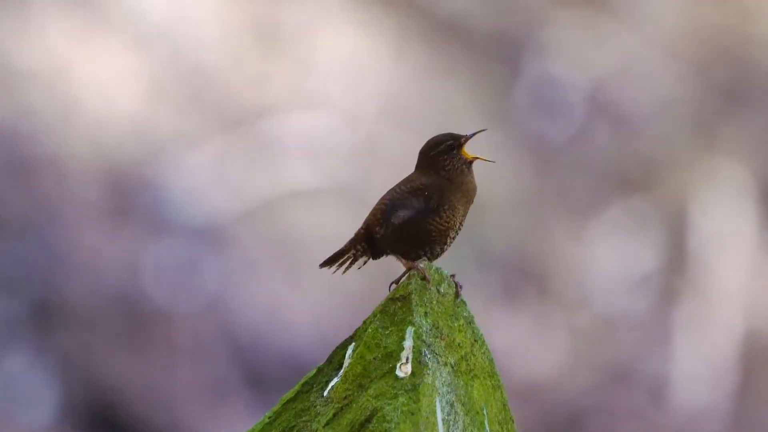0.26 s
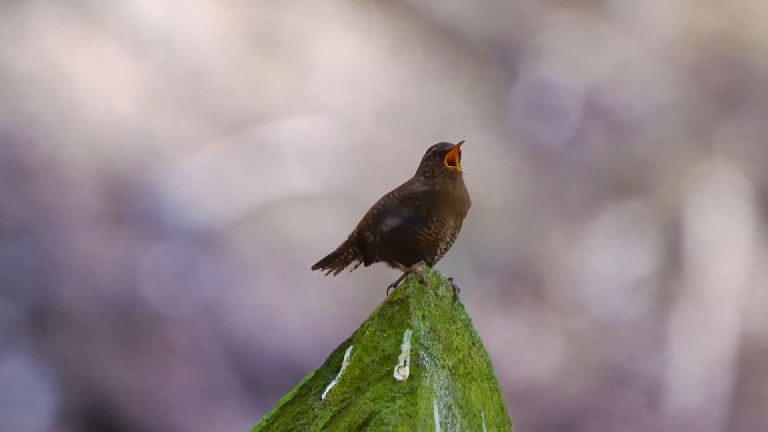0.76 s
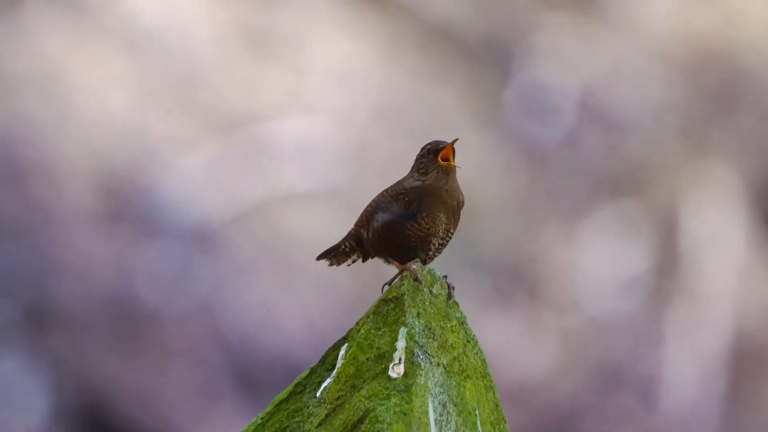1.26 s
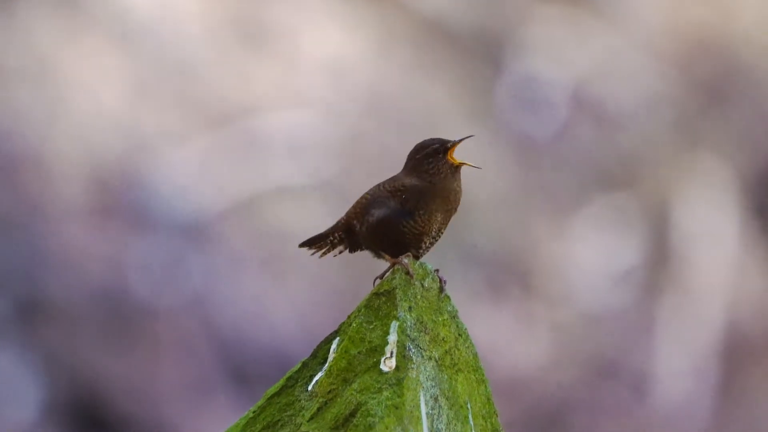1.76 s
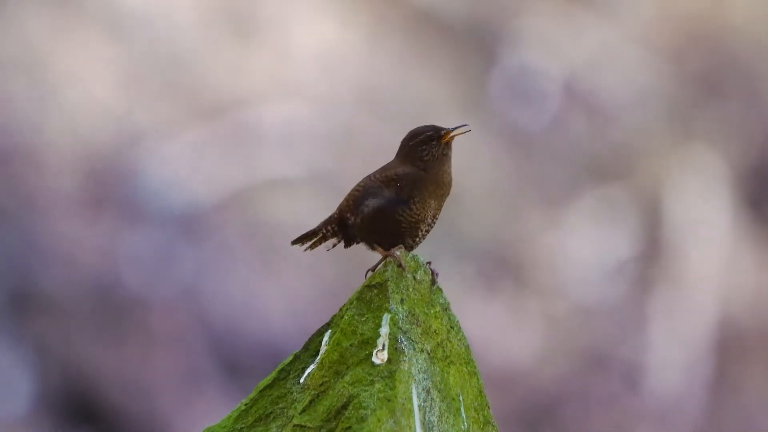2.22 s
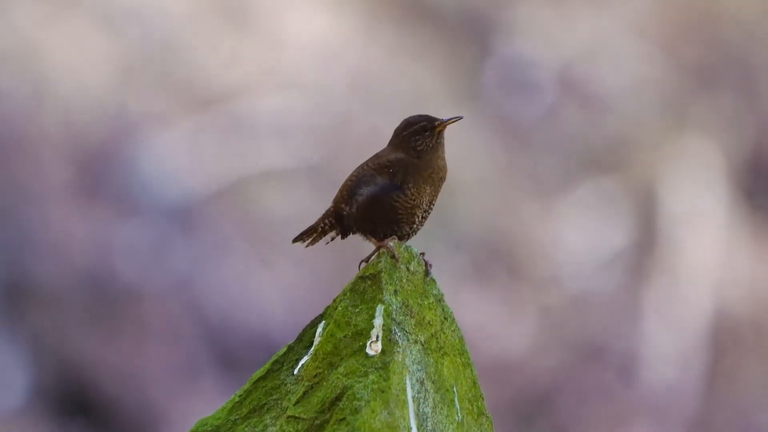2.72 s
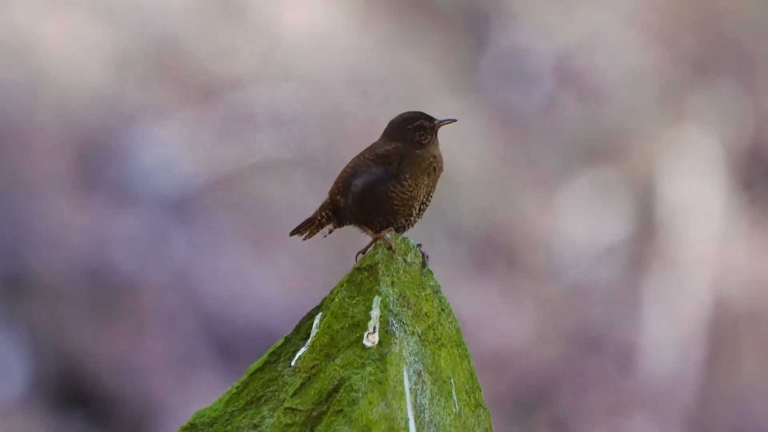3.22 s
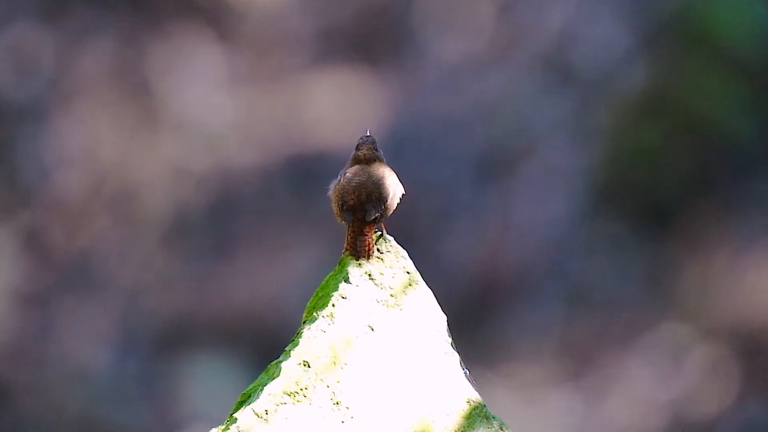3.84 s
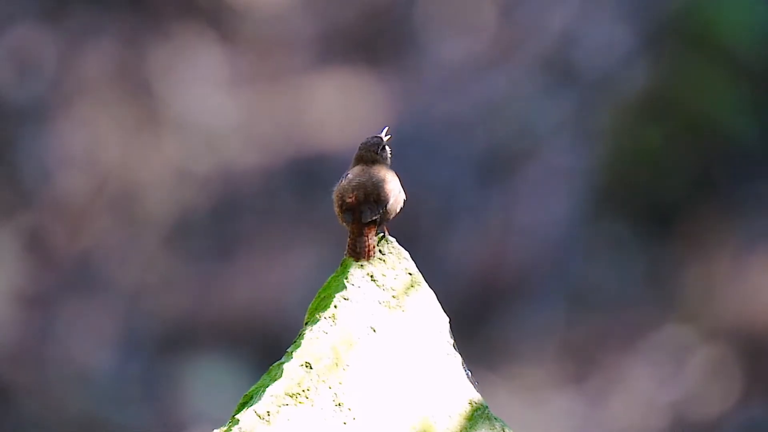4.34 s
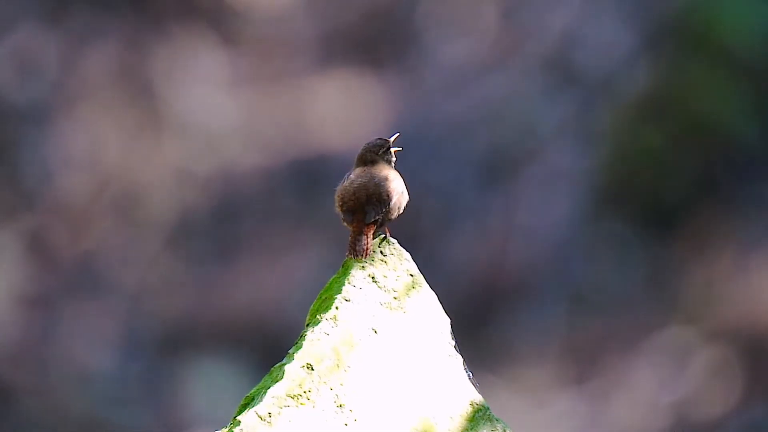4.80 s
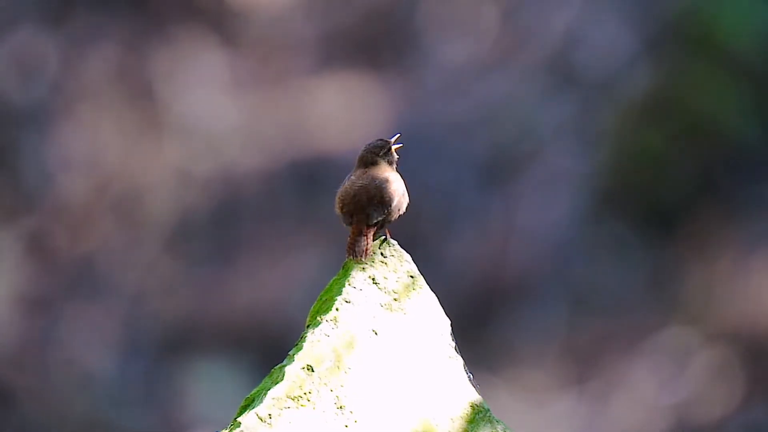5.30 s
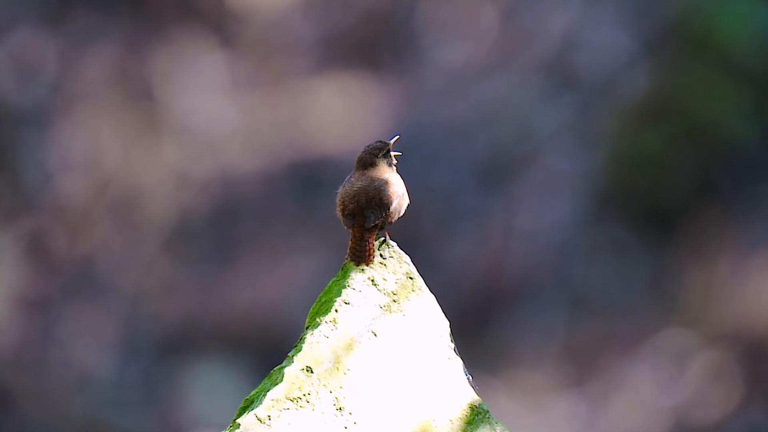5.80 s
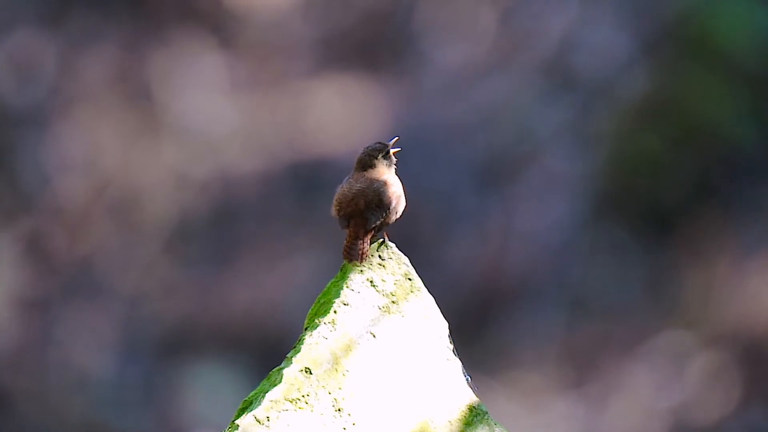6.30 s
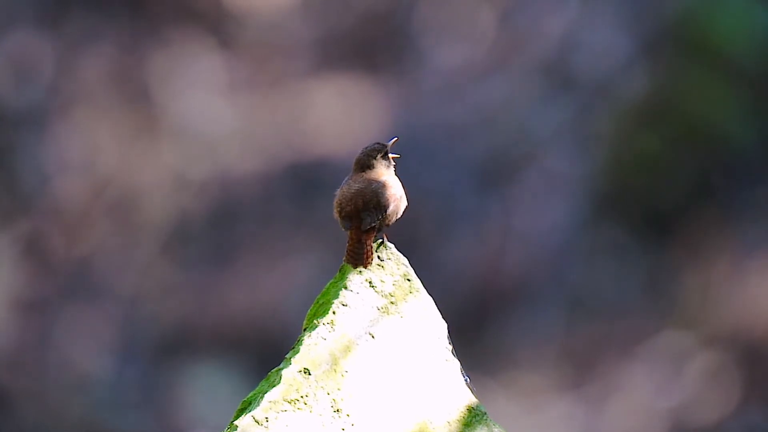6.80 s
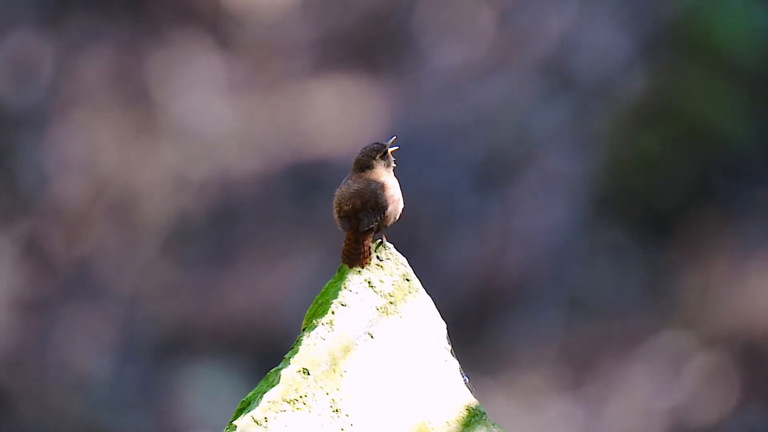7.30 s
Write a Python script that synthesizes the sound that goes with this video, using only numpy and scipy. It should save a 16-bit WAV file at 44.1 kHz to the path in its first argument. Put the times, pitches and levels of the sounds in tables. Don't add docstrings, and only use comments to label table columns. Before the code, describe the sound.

Outdoors in a wood, a stream makes a steady, broad, bright hiss with little low rumble, throughout. From 0 s distant wrens twitter in very high, quick gliding whistles, echoing about a tenth of a second later from left and right and scattering among trees. At about 1.4 s a near wren, dry and almost central, adds sharp hiccuping chirps, a loud downward slide at 1.9 s, then a fast dry trill of about 28 pulses a second from 2.1 to 2.9 s, slowing slightly. From 2.9 to 3.7 s it alternates piercing falling sweeps and rises. Between 3.7 and 6.7 s only the farther birds sing, with whipping chirps around 4.3 to 4.8 s and varied whistles and flicks. The near verse returns at 6.8 s, its trill starting about 7.4 s and cut off at the end. Tiny ticks occur sporadically; the loudest notes are slightly clipped.

```python
import sys
import numpy as np
from scipy import signal
from scipy.fft import rfft, irfft, next_fast_len
from scipy.io import wavfile
from scipy.ndimage import uniform_filter1d, minimum_filter1d, map_coordinates

SR = 44100
rng = np.random.default_rng(int(sys.argv[2]) if len(sys.argv) > 2 else 0)


def volts_from_db(level):
    exponent = np.asarray(level, float) / 20
    return 10 ** exponent


def wav_record(signal):
    frames = np.transpose(np.atleast_2d(signal))
    bounded = np.clip(frames, -1, 1)
    quanta = np.round(bounded * 32767).astype(np.int16)
    wavfile.write(sys.argv[1], SR, quanta)


N = 332955

# [length/s, start f/Hz, middle f/Hz, end f/Hz, level/dB]
HICCUP = [(.036, 8600, 8480, 8300, -8.5), (.033, 8310, 7930, 7810, 0)]
FIRST_HICCUP = [(.036, 8170, 8330, 8050, -9), (.036, 8080, 7620, 7480, 0)]
LONG_SWEEP = [(.036, 7670, 6710, 5880, -3), (.039, 5880, 5340, 4880, 0)]
FADE = [(.014, 7300, 7480, 7650, -4), (.13, 7650, 7380, 7230, 0)]
SHORT_SWEEP = [(.03, 6500, 6090, 5630, -5), (.027, 5650, 5080, 4760, 0)]
STEEP_PLUNGE = [(.023, 6720, 5470, 4800, 0), (.024, 4760, 4330, 3980, -2.5)]
CREST = [(.016, 7000, 7450, 7750, 0), (.014, 7750, 7830, 7750, 0)]
PERK = [(.066, 6080, 6110, 6400, 0)]
SLIDE = [(.049, 6360, 5890, 5370, -10), (.046, 5370, 4810, 4250, 0)]
SWEEP = [(.035, 7200, 6350, 5680, -5), (.032, 5650, 5060, 4750, 0)]
RISE = [(.044, 6340, 6680, 6840, -2), (.039, 6840, 7040, 7380, 0)]
QUICK_SWEEP = [(.029, 7400, 6700, 5950, -7.5), (.024, 5880, 5490, 5030, 0)]
LONG_RISE = [(.105, 6620, 7320, 7700, 0)]
VEE = [(.024, 6880, 6520, 6270, -1.5), (.023, 6270, 6630, 7030, 0)]
LOW_VEE = [(.021, 5850, 5600, 5330, -4), (.022, 5320, 5660, 6120, 0)]
SIGH = [(.014, 5520, 5460, 5390, -3), (.026, 5390, 5260, 5140, 0), (.033, 5150, 4960, 4680, -4.5)]
HOOK = [(.039, 5780, 5810, 5580, -3), (.038, 5650, 5050, 4400, 0)]
PLUNGE = [(.025, 6200, 5420, 4680, 0), (.023, 4700, 4300, 3930, -1.5)]
CLIMB = [(.05, 4160, 4240, 4530, -3), (.046, 4500, 5050, 5850, 0)]
SWOOP = [(.025, 3300, 3500, 3720, -9.5), (.026, 3730, 3970, 4270, 0)]
DOT = [(.015, 4360, 4240, 3960, 0)]
DIP = [(.029, 4450, 3720, 3330, 0)]
DROOP = [(.08, 7420, 7180, 7030, -1.5)]
PLATEAU = [(.085, 7420, 7610, 7510, 0)]
FLICK = [(.032, 5290, 5420, 5840, 0)]
WHIP = [(.019, 4720, 5240, 5620, 0)]
SEET = [(.026, 7460, 6910, 6900, 0)]
CHEW = [(.037, 6340, 6100, 6110, 0)]
ARCH = [(.035, 6230, 6520, 6520, -2), (.03, 6520, 6230, 5980, 0)]
NEAR_VERSE_S = [1.319, 6.685]
SETTLED = 0.89


def unit(x):
    return x / np.sqrt(np.mean(x ** 2) + 1e-20)


def along(points, hz):
    f, v = np.transpose(points)
    return np.interp(np.log(hz + 1), np.log(f + 1), v)


def wobble(rate):
    knots = rng.standard_normal(int(N * rate / SR) + 4)
    return map_coordinates(knots, [np.arange(N) * rate / SR])


def filtered(x, response):
    m = next_fast_len(N + 8192)
    return irfft(rfft(x, m) * response(np.fft.rfftfreq(m, 1 / SR)), m)[..., :N]


def stream():
    # [f/Hz, level per Hz/dB]
    colour = [(300, -93), (500, -69), (800, -51), (1250, -38), (2070, -18), (4250, -1.5), (4910, -2.5),
              (8470, -7), (11400, -13), (15500, -22)]
    # [f/Hz, correlation]
    likeness = [(1000, 0.88), (2000, .95), (4000, 0.55), (8000, 0.36), (13000, 0.0)]
    z = signal.stft(rng.standard_normal((2, N)), nperseg=512)[2]
    patches = uniform_filter1d(rng.standard_normal(z.shape[1:]), size=6, axis=0)
    patches = uniform_filter1d(patches, size=10, axis=1)
    pair = signal.istft(z * volts_from_db(0.85 * unit(patches)), nperseg=512)[1][:, :N]

    def mid_side(hz):
        angle = np.arccos(np.clip(along(likeness, hz), -1, 1)) / 2
        return volts_from_db(along(colour, hz)) * [np.cos(angle), np.sin(angle)]

    mid, side = filtered(pair, mid_side)
    water = volts_from_db(-27.5) * unit(np.array([mid + side, mid - side]))
    return water * volts_from_db([[-0.6], [0.6]])


def trees(x, t60, opposed=0):
    t = np.arange(int(0.6 * SR)) / SR
    envelope = volts_from_db(-60 * t / t60) * (1 - np.exp(-t / 0.001))
    shared, left, right = rng.standard_normal((3, len(t))) * envelope
    tail = np.array([left + opposed * shared, right - opposed * shared])
    return signal.fftconvolve(x[None], tail / np.linalg.norm(tail[0]), axes=1)[:, :N]


def thicket(far):
    calls = far.mean(axis=0)
    twigs = volts_from_db(-7) * trees(calls, t60=0.04, opposed=0.8)
    trunks = volts_from_db(-4.5) * trees(calls, t60=0.55, opposed=0.7)
    return twigs + trunks


def echo(x, delay_ms, later_ms):
    s, ms = np.transpose(delay_ms)
    late = (np.interp(np.arange(N) / SR, s, ms) + later_ms) * SR / 1000
    return map_coordinates(x, [np.arange(N) - late], order=3)


def echoed(x, later_ms, left_db, right_db):
    # [t/s, delay/ms]
    left_delay = [(0, 72), (1.5, 82), (3.3, 90), (4.998, 76.6), (6.3, 75), (7.5, 75)]
    # [t/s, delay/ms]
    right_delay = [(0, 113.3), (0.599, 113.8), (3.502, 134.9), (5.7, 125.3), (7.5, 122.3)]
    rough = x + volts_from_db(-10) * trees(x, t60=0.034)
    left = volts_from_db(left_db) * echo(rough[0], left_delay, later_ms[0])
    right = volts_from_db(right_db) * echo(rough[1], right_delay, later_ms[1])
    spill = volts_from_db(-11.5)
    return x + np.array([left - spill * right, right - spill * left])


def song(notes, edge, swell_db, flutter_db, overtone_db):
    # [f/Hz, loss one octave away/dB]
    throat_hz, throat_loss_db = (5540, 19)
    out, turning = np.zeros(N + SR), np.zeros(N + SR)
    for s, length, *glide_hz, db in notes:
        t = np.arange(int((length + edge) * SR)) / SR
        u = (t - edge / 2) / length
        hz = np.polyval(np.polyfit([0, 0.5, 1], glide_hz, deg=2), u)
        off_throat = np.log2(hz / throat_hz) ** 2 - np.log2(glide_hz[1] / throat_hz) ** 2
        level_db = db + swell_db * (u - 0.98) - throat_loss_db * off_throat
        phase = 2 * np.pi * np.cumsum(hz) / SR
        first, join = round(max(s - edge / 2, 0) * SR), int(edge / 2 * SR)
        phase = phase + turning[first + join] - phase[join]
        turning[first:][:len(t)] = phase
        edges = np.sin(np.pi / 2 * np.clip(np.minimum(t, t[-1] - t) / edge, 0, 1)) ** 2
        tone = np.sin(phase) + volts_from_db(overtone_db) * np.sin(2 * phase)
        out[first:][:len(t)] += volts_from_db(level_db) * edges * tone
    return out[:N] * volts_from_db(flutter_db * wobble(130))


def syllables(rows, start=0):
    notes = []
    for s, bends, db, *moved_hz in rows:
        scale = moved_hz[0] / bends[0][2] if moved_hz else 1
        for length, *glide_hz, part_db in bends:
            notes.append((start + s, length, *(scale * np.array(glide_hz)), db + part_db))
            s = s + length
    return notes


def verses(rows, starts):
    return [note for start in starts for note in syllables(rows, start)]


def runs(rows):
    repeats = []
    for bends, first, last, rate, first_db, last_db in rows:
        for u in np.linspace(0, 1, round((last - first) * rate) + 1):
            repeats.append((first + u * (last - first), bends, first_db + u * (last_db - first_db)))
    return syllables(repeats)


def whistles(rows, done=0.5):
    return [(s, length, a, a + done * (b - a), b, db) for s, length, a, b, db in rows]


def farthest_bird():
    # [syllable, first t/s, last t/s, rate/Hz, first level/dB, last level/dB]
    repeats = [
        (FLICK, 5.73, 5.9, 11.8, -21, -20),
        (LOW_VEE, 5.967, 6.303, 11.9, -21, -16),
        (SWOOP, 6.675, 6.84, 6, -16, -16.5),
        (DIP, 6.752, 6.92, 6, -19.5, -20),
    ]
    # [t/s, length/s, start f/Hz, end f/Hz, level/dB]
    straight = [
        (5.283, .035, 4170, 4120, -26),
        (5.5, .03, 4760, 5010, -23),
        (6.024, .036, 3810, 3660, -25),
        (6.579, .042, 4700, 3300, -19.5),
    ]
    settling = [
        (6.488, .052, 5330, 4930, -13.5),
    ]
    notes = runs(repeats) + whistles(straight) + whistles(settling, SETTLED)
    voice = song(notes, edge=0.0061, swell_db=1.0, flutter_db=2.0, overtone_db=-44)
    return echoed(voice, later_ms=(16, 24), left_db=-4, right_db=-2.5)


def far_bird():
    # [t after the start/s, syllable, level/dB, f if moved/Hz]
    verse = [
        (-.007, PERK, -14),
        (.532, SIGH, -7),
        (.652, DOT, -17, 4300),
        (.698, DOT, -16, 4180),
    ]
    verse_starts = [.154, 6.507]
    # [t/s, syllable, level/dB, f if moved/Hz]
    others = [(.163, DROOP, -21.5), (.302, DROOP, -22), (.465, DROOP, -21.5), (.932, PLATEAU, -18.5),
              (1.057, PLUNGE, -13), (1.175, CLIMB, -13), (6.14, FADE, -18.5), (7.404, PLUNGE, -10.5),
              (1.33, PLUNGE, -14, 5340), (1.485, DROOP, -23), (1.64, DROOP, -21.5, 7260),
              (1.787, HOOK, -11.5), (1.901, DOT, -14, 4500), (2.426, QUICK_SWEEP, -9),
              (2.65, QUICK_SWEEP, -9.2, 6820), (2.883, QUICK_SWEEP, -9.5, 6620), (3.11, QUICK_SWEEP, -8),
              (3.352, ARCH, -12.5), (3.557, CLIMB, -10, 4480), (3.7, STEEP_PLUNGE, -11.5),
              (2.396, CREST, -22), (5.266, HOOK, -9), (5.701, DOT, -12.5, 4570), (5.766, DOT, -15, 4330),
              (5.825, DOT, -14.5), (6.389, DOT, -15.5), (6.436, DOT, -15.5), (7.293, PLATEAU, -17.5)]
    # [syllable, first t/s, last t/s, rate/Hz, first level/dB, last level/dB]
    repeats = [
        (VEE, .252, .586, 12, -17.5, -15.5),
        (VEE, 6.607, 6.939, 12, -17.5, -15),
        (LONG_RISE, 2.544, 2.999, 4.4, -20.5, -19),
        (WHIP, 4.307, 4.707, 7.5, -12.5, -9.5),
        (SEET, 4.333, 4.73, 7.5, -26, -23),
        (CHEW, 4.363, 4.759, 7.5, -16.5, -14.5),
    ]
    # [t/s, length/s, start f/Hz, end f/Hz, level/dB]
    straight = [(.031, .052, 4310, 4130, -10.5), (.135, .027, 7250, 7450, -26),
                (.582, .02, 7760, 7650, -32), (.632, .036, 7360, 7110, -19),
                (1.934, .014, 4480, 4450, -22.5), (3.238, .065, 4350, 4370, -13.3),
                (3.455, .018, 5210, 5030, -11), (3.495, .017, 4750, 4080, -15),
                (3.869, .064, 6450, 6560, -15), (4.128, .046, 6550, 5900, -14),
                (4.852, .082, 4330, 4120, -12), (5.019, .19, 7700, 8060, -21),
                (5.409, .03, 3860, 3710, -23), (5.497, .035, 5610, 5320, -9.5),
                (5.528, .029, 5320, 4410, -11.5), (5.599, .065, 5430, 5230, -9),
                (5.893, .041, 5770, 5860, -14), (5.933, .036, 5940, 5110, -10.5),
                (6.338, .031, 5620, 4990, -9.5), (6.68, .06, 5680, 5650, -20)]
    settling = [
        (3.813, .08, 6730, 6460, -16.6),
        (3.99, .102, 8030, 7770, -22.5),
        (4.215, .046, 6710, 4780, -14.5),
        (5.003, .019, 8910, 7990, -32.6),
        (7.072, .085, 6490, 6280, -19),
    ]
    notes = verses(verse, verse_starts) + syllables(others) + runs(repeats)
    notes = notes + whistles(straight) + whistles(settling, SETTLED)
    voice = song(notes, edge=0.0095, swell_db=3.0, flutter_db=1.5, overtone_db=-40)
    return echoed(voice, later_ms=(0, 0), left_db=-1.5, right_db=-1.5)


def trill():
    # [length/s, start f/Hz, middle f/Hz, end f/Hz]
    length, *glide_hz = (.012, 4100, 4350, 4470)
    pulse_db = [-10.5, -10, -6, -9, -10.5, -11.5, -9, -7.2, -11, -14.5, -12.5, -8, -9, -10, -11.5, -11, -9,
                -7, -8, -9.5, -11, -6.5, -11]
    k = np.arange(len(pulse_db))
    slowing_s = 0.00018 * np.maximum(k - 12, 0) ** 2
    centre = 0.743 + 0.035 * k + slowing_s
    notes = []
    for start in NEAR_VERSE_S:
        for i, s, db in zip(k, centre, pulse_db):
            if start + s < N / SR:
                sagged_hz = np.array(glide_hz) * (1 - 0.001 * i)
                notes.append((start + s - length / 2, length, *sagged_hz, db + 1.5))
    return notes


def near_bird():
    # [t after the start/s, syllable, level/dB, f if moved/Hz]
    verse = [
        (.122, FIRST_HICCUP, -13),
        (.242, HICCUP, -11),
        (.368, HICCUP, -10.7),
        (.487, HICCUP, -16.5),
        (.608, SLIDE, -2.3),
    ]
    # [t/s, syllable, level/dB, f if moved/Hz]
    others = [
        (.08, DOT, -13.5, 4180),
        (2.926, LONG_SWEEP, -4.5),
        (3.042, RISE, -9, 6780),
        (3.167, SWEEP, -4, 6240),
        (3.278, RISE, -13, 6650),
        (3.42, SHORT_SWEEP, -6.4),
        (3.514, RISE, -10),
        (3.65, SWEEP, -5.5),
    ]
    # [t/s, length/s, start f/Hz, end f/Hz, level/dB]
    straight = [(0, .052, 7330, 7190, -27), (.007, .035, 5750, 4980, -10.5),
                (.078, .017, 5240, 5090, -15.5), (.1, .025, 5800, 5050, -18),
                (1.317, .065, 5620, 5750, -20), (1.512, .021, 7950, 7260, -27),
                (1.968, .021, 4456, 4430, -18), (2.036, .014, 4510, 4460, -13),
                (7.384, .052, 4420, 3530, -14.5), (7.503, .015, 6900, 7350, -25),
                (7.518, .035, 7350, 4900, -21)]
    notes = verses(verse, NEAR_VERSE_S) + syllables(others) + whistles(straight)
    voice = song(notes, edge=0.008, swell_db=5, flutter_db=2.0, overtone_db=-45)
    chirps = song(trill(), edge=0.0045, swell_db=3.0, flutter_db=2.5, overtone_db=-42)
    voice = voice + volts_from_db(-8.5) * trees(voice, t60=0.25)[0]
    return voice + chirps + volts_from_db(-12) * trees(chirps, t60=0.2)[0]


def scene():
    water = stream()
    far = farthest_bird() + far_bird()
    birds = (near_bird() + far) * volts_from_db([[0.4], [-0.4]])
    return birds + thicket(far) + water


def short_ticks():
    # [t/s, left level/dB, right level/dB]
    tick_levels = [(.0002, -12, -16), (0.0825, -11, -16), (1.9173, -10, -35), (2.6978, -15, -31),
                   (3.2173, -18, -65), (3.473, -22, -21), (3.7122, -34, -60), (4.648, -12, -11),
                   (6.0133, -12.5, -28), (7.3787, -5, -6), (7.427, -26, -26), (7.5497, -6, -5)]
    ticks = np.zeros((2, N))
    for s, left_db, right_db in tick_levels:
        ticks[:, min(round(s * SR), N - 1)] = -volts_from_db([left_db, right_db])
    return filtered(ticks, lambda hz: 1 / (1 + (hz / 4000) ** 2))


def low_pass(x):
    return signal.sosfilt(signal.butter(12, 15630, fs=SR, output="sos"), x)


def record(dry):
    needed = np.minimum(1, 1.005 / np.maximum(np.abs(dry).max(axis=0), 1e-9))
    gain = uniform_filter1d(minimum_filter1d(needed, size=301), size=151)
    mix = np.clip(dry * gain + short_ticks(), -1, 1)
    return low_pass(mix)


dry = scene()
out = record(dry)
wav_record(out)
```